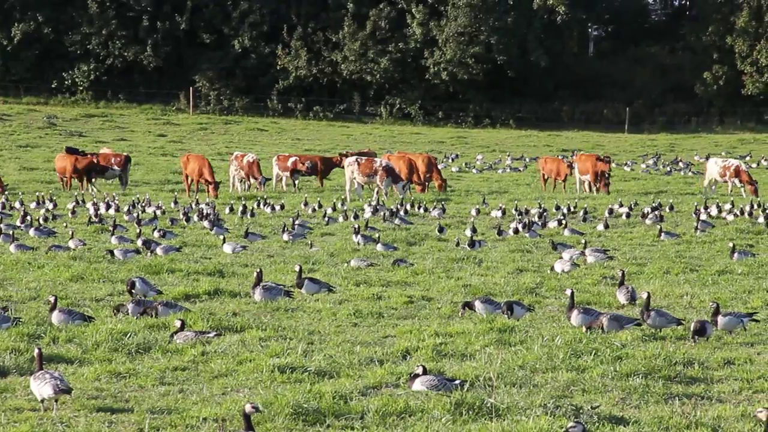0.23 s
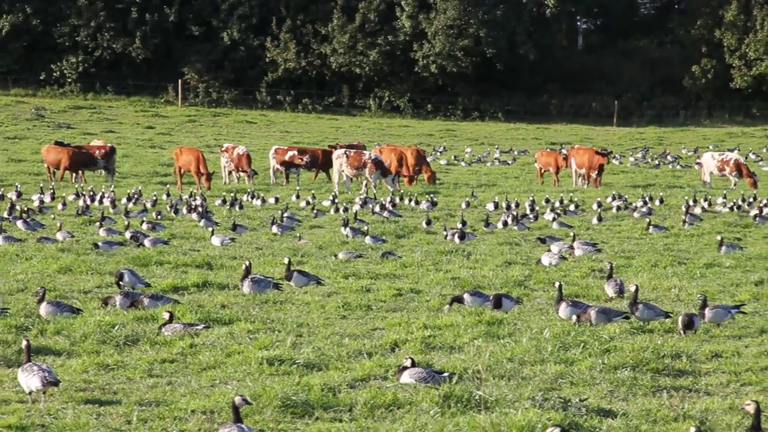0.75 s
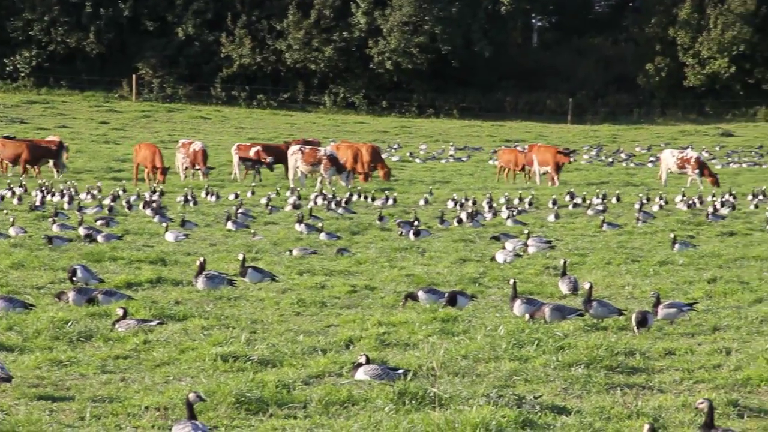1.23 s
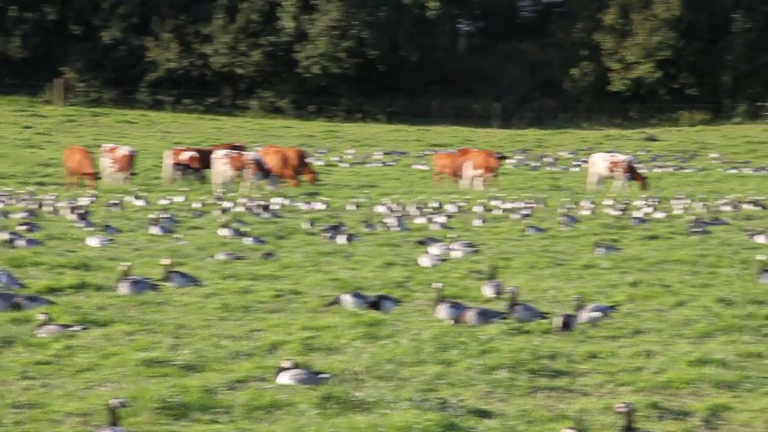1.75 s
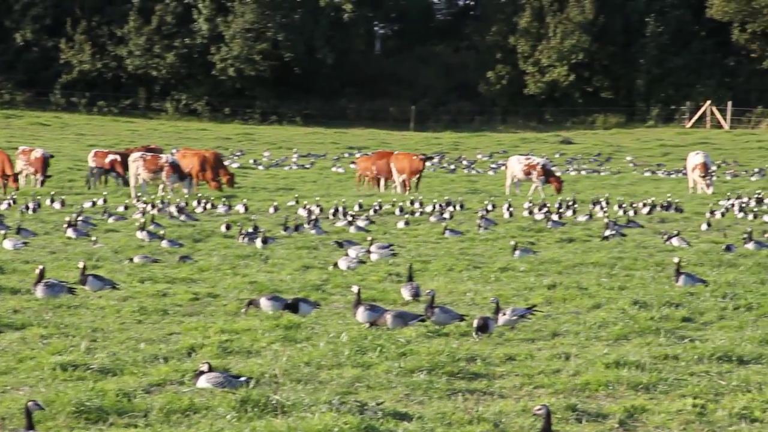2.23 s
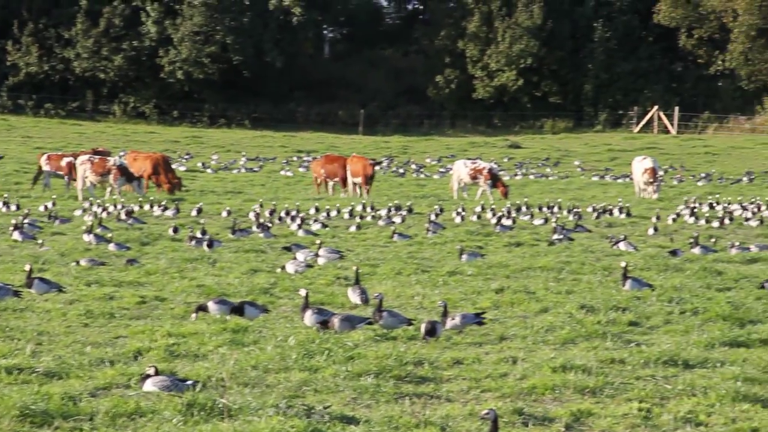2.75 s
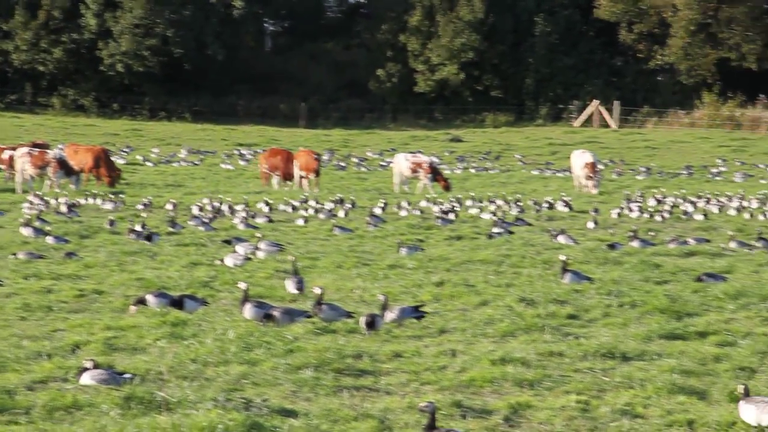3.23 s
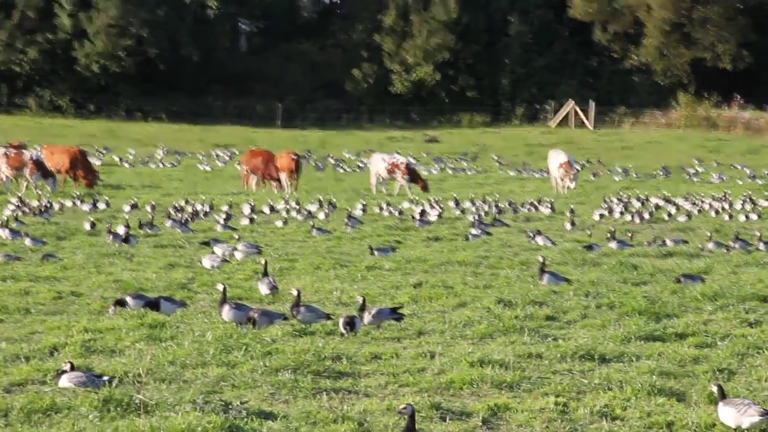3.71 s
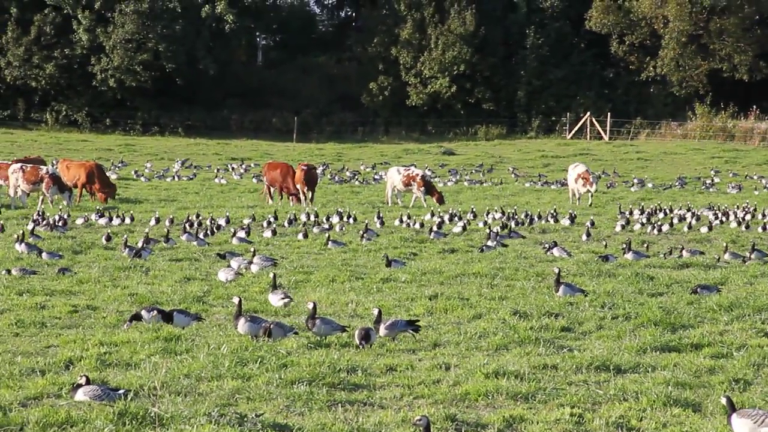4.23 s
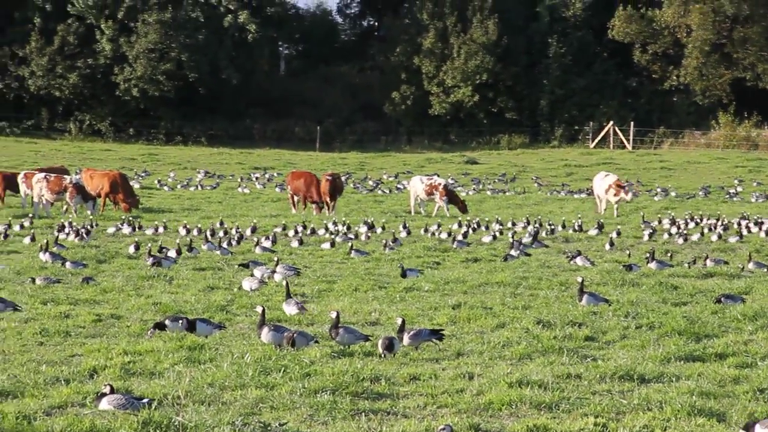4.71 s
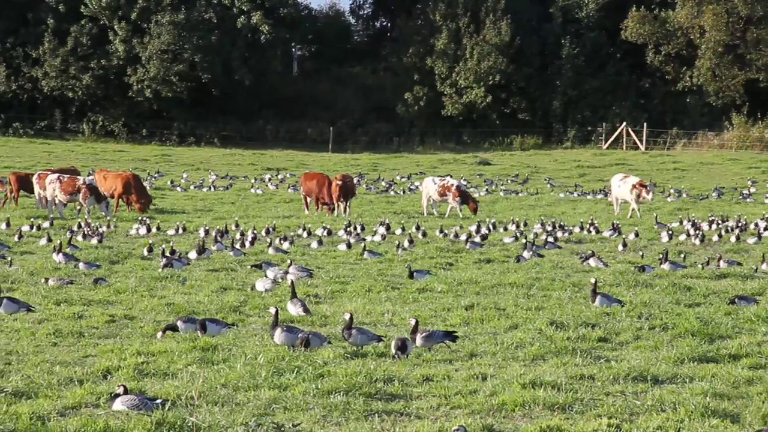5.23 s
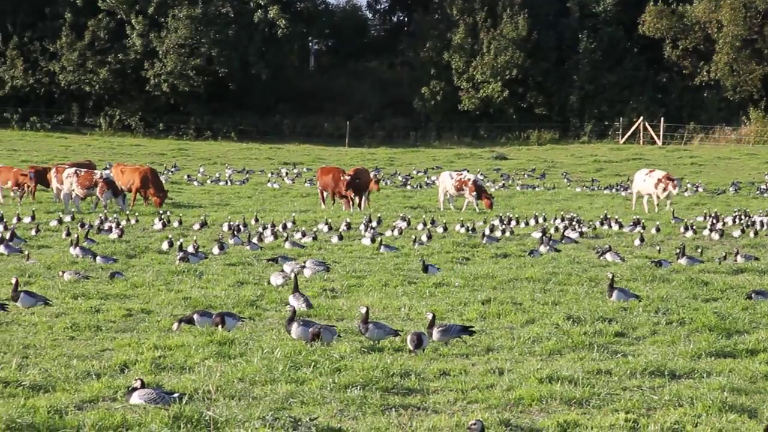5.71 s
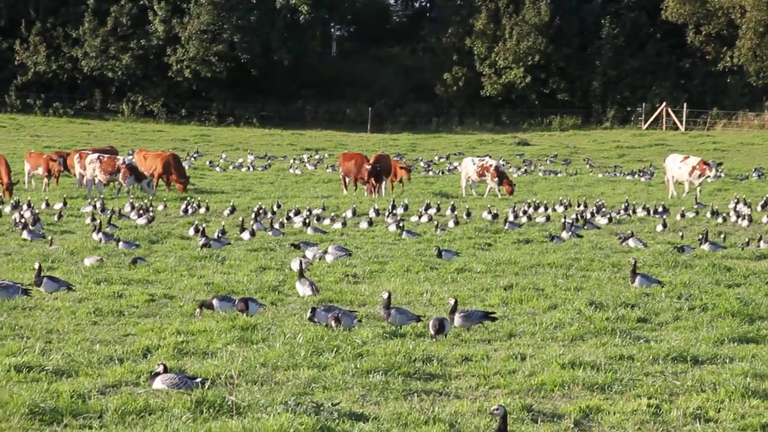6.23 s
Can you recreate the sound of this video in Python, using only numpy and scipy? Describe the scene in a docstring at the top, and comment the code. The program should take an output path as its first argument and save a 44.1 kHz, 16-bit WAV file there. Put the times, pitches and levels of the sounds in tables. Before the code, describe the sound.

Overlapping short goose calls, clear and hoarse, over a distant gabble and buffeting low wind, with five sharp close barks in the second half.

```python
"""A pasture in front of a wood: a big flock of geese yaps, and one bird close by barks five times.
Each call is a harmonic series on an arched pitch; a second voice of the syrinx modulates it into a rasp.
Many overlapping calls merge into the gabble of the far flock, and decaying noise gives the echo of the trees.
Wind is fluttering low noise with single pressure swings as eddies hit the microphone.
Shaped noise is the rush of open air and two faint hisses; wavering sines are a distant drone."""
import sys
import numpy as np
from scipy import signal
from scipy.fft import rfft, irfft, next_fast_len
from scipy.io import wavfile

SR = 44100
rng = np.random.default_rng(int(sys.argv[2]) if len(sys.argv) > 2 else 0)


def store_wav(level_fs):
    """Save 16-bit WAV to argv[1]."""
    pcm = np.round(np.clip(np.atleast_2d(level_fs), -1, 1) * 32767)
    wavfile.write(sys.argv[1], SR, pcm.T.astype(np.int16))


N = 284886

# resonance of throat and open bill heard across the field: [f/Hz, relative level/dB]
FIELD_THROAT = [(700, -50.5), (1200, -13), (1650, 3), (1900, 4), (2550, -1), (3000, -10), (3500, -15.5),
                (4200, -25.5), (5500, -20), (6800, -28.5), (8200, -36), (10000, -42), (12000, -43.5),
                (15500, -58)]
# weak voice before and after the body of a call, each as a share of its length
FRINGE = 0.13


def undb(db):
    """Amplitude ratio: 20 dB is a factor of ten."""
    return 10 ** (np.asarray(db) / 20)


def level(x, db=0):
    """Root-mean-square level: scale a signal to it, in dB relative to 1."""
    return x * undb(db) / np.sqrt(np.mean(x ** 2) + 1e-20)


def curve(rows):
    """Linear interpolation of [t/s, value] rows over the whole scene."""
    return np.interp(np.arange(N) / SR, *np.transpose(rows))


def shape(points, hz):
    """Frequency response: gain at hz from [f/Hz, level/dB] points, straight on a logarithmic axis."""
    f, db = np.transpose(points)
    return undb(np.interp(np.log(np.maximum(hz, 1)), np.log(f), db))


def noise(points, n):
    """Coloured noise: white noise weighted by a frequency response, at unit rms."""
    spectrum = rfft(rng.standard_normal(N)) * shape(points, np.fft.rfftfreq(N, 1 / SR))
    return level(irfft(spectrum, N)[:n])


def walk(rate, n, size=512):
    """Slow random fluctuation: normal values, rate of them per second, joined by straight lines."""
    position = np.arange(n) / SR * rate + rng.random()
    return 1.377 * np.interp(position, np.arange(size), rng.standard_normal(size))


def add(out, s, x):
    """Superposition: mix a sound in from time s."""
    i = max(int(s * SR), 0)
    part = out[i:i + len(x)]
    part += x[:len(part)]


def open_air(swell_db=0.47, drone_fade_db_per_s=-1.0):
    """Broadband noise: the slowly swelling rush of the countryside, with a fading drone and two hisses."""
    # spectrum of the open air: [f/Hz, relative level/dB]
    air = [(30, -11), (150, 7.5), (350, -4.5), (550, -0.5), (750, 2), (1050, -1), (1400, -3), (2500, -19.5),
           (4000, -25), (8000, -33.5), (15500, -38)]
    # level of the rush about which it swells: [t/s, level/dB]
    air_level = [(0, -35.5), (1.3, -37.5), (2.1, -37.5), (2.6, -34.5), (3.2, -37), (4.5, -37.5),
                 (5.05, -36), (5.5, -36), (6.46, -36.5)]
    # partials of the faint distant drone: [f/Hz, mean level/dB]
    drone = [(366, -53), (439, -56.5)]
    # faint broadband hisses: [start t/s, length t/s, level/dB]
    hisses = [(4.266, 0.18, -50), (5.814, 0.2, -58)]
    out = noise(air, N) * undb(curve(air_level) + swell_db * walk(2.455, N))
    fade = level(undb(drone_fade_db_per_s * np.arange(N) / SR))
    for hz, db in drone:
        size = np.sqrt(2) * undb(db + 0.8 * walk(3.98, N)) * fade
        wavering_hz = hz * (1 + 0.00814 * walk(25, N))
        out += size * np.sin(2 * np.pi * np.cumsum(wavering_hz) / SR)
    for s, length, db in hisses:
        n = int(length * SR)
        hiss = noise([(3000, -1), (8000, -4), (11000, -1), (15000, -6)], n)
        add(out, s, level(hiss * np.hanning(n), db))
    return out


def wind_strength():
    """Addition of powers: the gain of a breeze that slackens at the end, with bell-shaped gusts on top."""
    # the breeze between gusts: [t/s, rumble level/dB before the common trim]
    breeze = [(0, -32.5), (1.3, -33.5), (2.4, -30.5), (4.4, -33), (5.7, -32), (6.46, -41.5)]
    # gusts that swell and die away: [peak t/s, length t/s, rumble level/dB before the common trim]
    gusts = [(0.387, 0.095, -24.5), (0.612, 0.1, -21), (0.802, .15, -29), (2.683, 0.51, -31.5),
             (3.635, 0.79, -29.5), (5.353, 0.55, -31)]
    t = np.arange(N) / SR
    gust_power = sum(undb(db) ** 2 * np.exp(-(2 * (t - s) / length) ** 2) for s, length, db in gusts)
    return np.sqrt(undb(curve(breeze)) ** 2 + gust_power)


def wind(strength, rumble_db=-4, flutter_db=4, buffet_db=-1, buffet_hz=130.4, cycles=0.3,
         snap_db=-17, snap_ratio=2.4, eddy_db=4.5, spread_db=3, count=70):
    """Turbulence at a microphone: fluttering rumble, and eddies that each swing the pressure about once."""
    # spectrum of the rumble: [f/Hz, relative level/dB]
    rumble = [(20, -5), (45, -7), (80, 1.5), (130, -3), (200, -7.5), (300, -9.5), (500, -18.5), (1000, -42),
              (3000, -82)]
    # the strongest eddies: [middle t/s, size level/dB before the common trim]
    buffets = [(.321, -9.5), (.424, -15.5), (0.569, -12), (0.597, -14.5), (.625, -12), (0.883, -13),
               (1.211, -9), (1.363, -6), (1.638, -12), (1.921, -14), (2.13, -14), (2.322, -16.5),
               (2.465, -15), (2.622, -11.5), (2.807, -13), (3.299, -18.5), (3.433, -17.5), (3.512, -10.5),
               (3.675, -11.5), (3.765, -16)]
    flutter = undb(flutter_db * np.tanh(walk(45, N)))
    out = level(noise(rumble, N) * flutter, rumble_db) * strength
    t = np.arange(-SR // 40, SR // 40) / SR

    def swing(hz):
        """Wave packet: a sine under a bell so narrow that about one swing is left."""
        return np.sin(2 * np.pi * hz * t) * np.exp(-0.5 * (hz * t / cycles) ** 2)

    def eddy(hz):
        """Superposition: a weaker, faster swing steepens the front."""
        return swing(hz) + undb(snap_db) * swing(snap_ratio * hz)

    for s, db in buffets:
        add(out, s + t[0], undb(db + buffet_db) * eddy(buffet_hz))
    # small eddies at random times grow with the wind
    for when, size, pace in rng.random((count, 3)):
        i = int(when * N)
        gain = strength[i] * undb(eddy_db + spread_db * (2 * size + 1))
        add(out, i / SR + t[0], gain * eddy(buffet_hz * (0.55 + 0.64 * pace)))
    return out


def wood_echo(x, t60=0.6, treble_t60=0.45, wet_db=-16):
    """Diffuse scattering: trunks and leaves return the calls as a decaying tail; the treble dies first."""
    t = np.arange(SR) / SR
    low, high = (
        signal.sosfilt(signal.butter(2, 3200, kind, fs=SR, output="sos"), rng.standard_normal(SR))
        for kind in ("low", "high"))
    tail = low * undb(-60 * t / t60) + high * undb(-60 * t / treble_t60)
    tail *= 1 - np.exp(-t / 0.0011)
    return signal.fftconvolve(x, tail / np.linalg.norm(tail))[:N] * undb(wet_db)


def scatter(x, t60, wet_db):
    """Ground scattering: uneven ground near the bird adds a short smear, different for every call."""
    t = np.arange(SR // 10) / SR
    response = level(rng.standard_normal(len(t)) * undb(-60 * t / t60), wet_db) / np.sqrt(len(t))
    response[0] += 1  # direct sound
    y = signal.fftconvolve(x, response)
    return y * np.linalg.norm(x) / np.linalg.norm(y)


def colour(points, size):
    """Minimum-phase resonance: a causal response, so that each pulse rings on after it."""
    cepstrum = irfft(np.log(shape(points, np.fft.rfftfreq(size, 1 / SR))), size)
    # folding the cepstrum onto positive time makes the response causal
    cepstrum[1:size // 2] *= 2
    cepstrum[size // 2 + 1:] = 0
    return np.exp(rfft(cepstrum))


def call(length, pitches, throat, treble_db, tilt_db, second_hz, beat, swing, jitter, stray,
         shake_db, onset, edge, skew, bright, count=18):
    """Source and filter: overtones on an arched pitch, modulated by a second voice, coloured by the throat."""
    n = int(max(length, 0.02) * (1 + 2 * FRINGE) * SR)
    u = np.linspace(0, 1, n)
    # the pitch scoops up as the pressure builds, arches over, and sags as the pressure goes
    arch = np.polyval(np.polyfit([0, 0.5, 1], pitches, 2), u * (1 + 2 * FRINGE) - FRINGE)
    scoop, sag = 0.0336 * np.exp(-u / 0.1035), 0.124 * np.exp((u - 1) / 0.076)
    hz = arch * (1 - scoop - sag) * (1 + jitter * walk(604.0, n))
    # the second voice modulates size and phase, which puts sidebands round every overtone
    second_track = second_hz * hz / pitches[1] * (1 + stray * walk(192.9, n))
    second = np.sin(2 * np.pi * (np.cumsum(second_track) / SR + rng.random()))
    phase = 2 * np.pi * np.cumsum(hz) / SR + swing * second
    k = np.arange(1, count + 1)[:, None]
    audible = k * hz < SR * 0.45  # keeps overtones clear of aliasing
    pulses = -(np.cos(k * phase) * audible).sum(0) * (1 + beat * second)
    # the voice catches suddenly, swells and tapers off
    catch = 1 / (1 + np.exp((onset - u) / 0.022))
    swell = np.abs(np.sin(np.pi * u ** skew)) ** edge
    effort = catch * swell * undb(shake_db * walk(142.8, n))
    size = 2 * next_fast_len(n // 2 + 128)
    voice = rfft(pulses * effort, size) * colour(throat, size)
    f = np.fft.rfftfreq(size, 1 / SR) + 1
    upper = 1 / (1 + (3700 / f) ** 12)
    # the upper overtones come only with full effort; tilt_db is per octave
    treble = irfft(voice * upper * undb(tilt_db * np.log2(f / 5000)), size)[:n] * effort ** bright
    body = irfft(voice * (1 - upper), size)[:n]
    return level(body) + level(treble, treble_db)


def far_flock(gain_db=-4.0, spread_db=3, treble_db=-17, count=150):
    """Superposition of many sources: dulled far calls of varied pitch and hoarseness merge into a gabble."""
    # the gabble sinks, then rises again: [t/s, level/dB before the common trim]
    gabble = [(0, -32.5), (1.6, -42.5), (3.0, -40.5), (4.5, -41), (5.1, -36.5), (6.46, -34.5)]
    out = np.zeros(N)
    for i, (when, long, high, rough, fall) in enumerate(rng.random((count, 5))):
        hz = 700 + 350 * high
        pitches = (0.94 * hz, hz, (0.94 - 0.1255 * fall) * hz)
        honk = call(0.06 + 0.0487 * long, pitches, FIELD_THROAT, treble_db, 0, 0.55 * hz,
                    beat=0.85 * rough, swing=0.21 * rough, jitter=0.002 + 0.007 * rough, stray=0.1,
                    shake_db=1.5, onset=0.15, edge=1.1, skew=0.75, bright=0.6, count=9)
        start = (i + when) / count * N / SR - 0.05
        add(out, start, honk * undb(spread_db * rng.standard_normal()))
    return level(out, gain_db) * undb(curve(gabble))


def field_geese(gain_db=-1.0, clear_jitter=0.0016, hoarse_jitter=0.013, arch_drop=0.085, hoarse_lift=0.0448):
    """Modulation depth sets timbre: clear hoots and hoarse, brighter yaps, their pitch arch tilted up or down."""
    # geese in the field: [start t/s, length t/s, middle pitch f/Hz, tilt of the arch from start to end/%,
    # level/dB before the common trim, treble re lower overtones level/dB, roughness 0-1]
    honks = [(0.072, 0.096, 894, -5, -38, -12.5, 0.67), (0.158, 0.071, 858, -16, -55, -18, .13),
             (.22, 0.097, 825, 10, -46.5, -5.5, 0.38), (0.381, .078, 845, -12, -32.5, -20, 0.42),
             (0.439, 0.055, 803, -6, -38.5, -27, 0.2), (0.678, 0.07, 722, -16.5, -36, -16.5, .45),
             (0.772, 0.099, 981, 7, -36.5, -15.5, .55), (.87, 0.068, 922, 16, -34.5, -15.5, 0.42),
             (1.017, 0.097, 1094, -1.5, -36.5, -22, 0.82), (1.086, 0.065, 1068, -4.5, -44.5, -14, 0.24),
             (1.177, 0.092, 862, -1, -30.5, -18.5, 0.4), (1.316, 0.055, 858, -4.5, -37.5, -12, 0.36),
             (1.347, 0.092, 878, -11.5, -38.5, -16.5, 0.12), (1.419, 0.081, 919, -9.5, -36, -23, 0.56),
             (1.49, 0.068, 957, -3, -32.5, -16, .44), (1.553, 0.07, 914, -2.5, -43.5, -7.5, 0.42),
             (1.679, .17, 950, 1.5, -34.5, -14.5, 0.55), (1.725, 0.079, 770, -10.5, -32.5, -11, 0.16),
             (1.809, 0.1, 866, -8.5, -31.5, -15.5, 0.26), (1.993, 0.059, 853, 30, -37, -16, 0.18),
             (2.038, 0.075, 938, 4.5, -31, -10, 0.56), (2.106, 0.095, 916, 11.5, -35, -21.5, 0.48),
             (2.261, 0.078, 913, -0.5, -40.5, -13, 0.38), (2.365, 0.062, 720, 8, -31.5, -20, 0.33),
             (2.489, 0.072, 866, -10.5, -36.5, -17, 0.38), (2.629, 0.09, 858, -8.5, -32, -20.5, 0.34),
             (2.696, 0.095, 930, 2.5, -38.5, -12.5, 0.42), (2.822, .11, 943, 12, -30.5, -17.5, 0.52),
             (2.89, 0.11, 1043, -6, -31.5, -17, 0.55), (2.971, 0.075, 907, -10, -34.5, -18, .47),
             (3.085, .092, 886, 8.5, -26.5, -13.5, 0.59), (3.167, .092, 862, -0.5, -28.5, -15, 0.08),
             (3.225, 0.073, 771, -0.5, -35.5, -34, 0.16), (3.288, .1, 1124, 10.5, -36.5, -18, 0.85),
             (3.533, 0.11, 1045, 12.5, -38, -19, 0.64), (3.618, 0.057, 768, 6.5, -34, -22, 0.13),
             (3.673, 0.078, 902, -13.5, -26, -13.5, 0.6), (3.829, 0.094, 863, -5.5, -29.5, -16, .25),
             (3.943, 0.077, 681, -5, -37, -17, 0.39), (4.02, 0.1, 1149, -3, -35.5, -22, 0.72),
             (4.126, 0.1, 893, -0.5, -32, -17.5, 0.55), (4.233, 0.046, 741, 0.5, -33, -24, 0.24),
             (4.308, 0.06, 735, -4.5, -37, -23, 0.38), (4.457, 0.11, 862, -4, -29, -22, 0.22),
             (4.568, 0.082, 767, 18.5, -31.5, -17.5, 0.34), (4.671, .11, 832, -3.5, -31.5, -17, 0.28),
             (4.874, 0.092, 899, 4.5, -33, -25, 0.56), (5.248, 0.094, 858, -6, -30, -18.5, 0.36),
             (5.331, 0.086, 790, -18, -33, -22, 0.21), (5.419, 0.07, 852, -1.5, -41, -4, 0.3),
             (5.494, 0.071, 1134, -13.5, -33.5, -22, 0.6), (5.627, 0.074, 882, -8.5, -38, -19.5, .6),
             (5.76, 0.086, 870, -21.5, -31.5, -14, 0.51), (5.819, 0.089, 746, -14.5, -36, -13.5, 0.16),
             (5.978, 0.058, 759, 13, -36, -23, 0.21), (6.045, 0.094, 781, -4, -36.5, -16.5, 0.77),
             (6.26, .1, 910, -6.5, -34.5, -9.5, 0.64), (6.307, 0.087, 920, -16.5, -33.5, -29, 0.06)]
    out = np.zeros(N)
    for s, length, hz, glide, db, treble_db, rough in honks:
        # the voice stays clear at first and breaks up quickly when pushed further
        rough = np.clip(rough, 0, 1)
        hoarse = rough ** 2 * (3 - 2 * rough)
        jitter, shake_db = clear_jitter + hoarse_jitter * hoarse, 0.97 + 1.05 * rough
        second_hz = hz * rng.uniform(0.22, 0.34)
        # the ends lie below the middle; hoarse calls are flatter and swell in more gently
        ends = 1 - arch_drop + hoarse_lift * hoarse
        tilt = glide / 100 / 2
        pitches = hz * np.array([ends - tilt, 1, ends + tilt])
        honk = call(length, pitches, FIELD_THROAT, treble_db, 5 * (rough - 0.42), second_hz,
                    beat=1.28 * rough, swing=1.39 * hoarse, jitter=jitter, stray=0.0629,
                    shake_db=shake_db, onset=0.1 - 0.06 * hoarse, edge=0.66 + 0.5 * hoarse,
                    skew=0.97, bright=0.74, count=16)
        honk = scatter(honk, t60=0.1, wet_db=-5)
        add(out, s - FRINGE * length, level(honk, db + gain_db))
    return out


def near_goose(gain_db=-1.5, start_ratio=0.91, end_ratio=0.925, second_hz=415.3):
    """Two-voiced modulation: short, bright barks on one tune; the duller ones lose their top first."""
    # the near goose: [start t/s, length t/s, middle pitch f/Hz, level/dB before the common trim,
    # treble re lower overtones level/dB, roughness 0-1]
    barks = [(4.063, 0.086, 1130, -23.5, -5.5, 0.29), (4.401, 0.083, 1131, -21.5, -5.5, 0),
             (4.756, 0.085, 1126, -20.5, -6, 0.02), (5.061, .077, 1123, -21, -8, 0.54),
             (5.517, 0.085, 1125, -23, -9, 0.3)]
    # resonance of throat and open bill close by: [f/Hz, relative level/dB]
    near_throat = [(600, -57), (1150, -17.5), (1500, -5.5), (1850, 3.5), (2250, -1.5), (2650, -1.5),
                   (3000, -11.5), (4100, -4), (5200, 5.5), (6700, -7), (8200, -8.5), (10600, -24),
                   (12000, -13.5), (15500, -33)]
    out = np.zeros(N)
    for s, length, hz, db, treble_db, rough in barks:
        jitter, stray = 0.004 + 0.016 * rough, 0.02 + 0.07 * rough
        pitches = (hz * start_ratio, hz, hz * end_ratio)
        bark = call(length, pitches, near_throat, treble_db, 1.6 * (treble_db + 9), second_hz,
                    beat=1.0, swing=0.34, jitter=jitter, stray=stray, shake_db=0.87,
                    onset=0.13, edge=1.44, skew=1.0, bright=0.79)
        add(out, s - FRINGE * length, scatter(level(bark, db + gain_db), t60=0.038, wet_db=-2.0))
    return out


def scene():
    """Direct-to-reverberant ratio: the near bird is almost dry; the further ones carry more echo."""
    far, field, near = far_flock(), field_geese(), near_goose()
    echo = wood_echo(undb(-16) * near + field + undb(4) * far)
    return (open_air() + wind(wind_strength()) + echo + far + field + near)[None]


def record(dry, low_cut_hz=38, top_hz=15700):
    """Band limiting: a gentle high-pass thins the deepest rumble and a steep low-pass cuts the top."""
    thinned = signal.sosfilt(signal.butter(2, low_cut_hz, "high", fs=SR, output="sos"), dry)
    return signal.sosfilt(signal.ellip(10, 0.2, 80, top_hz, fs=SR, output="sos"), thinned)


dry = scene()
out = record(dry)
store_wav(out)
```